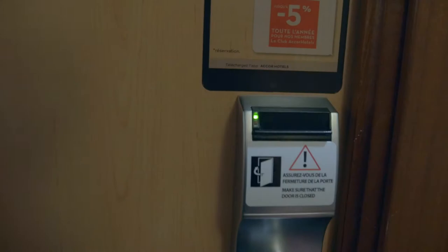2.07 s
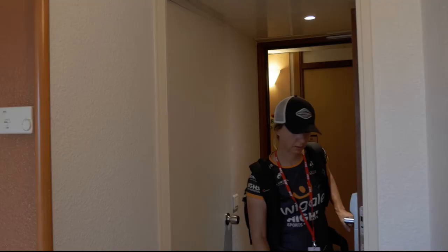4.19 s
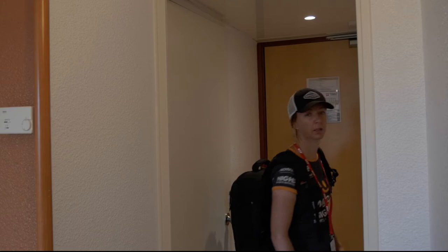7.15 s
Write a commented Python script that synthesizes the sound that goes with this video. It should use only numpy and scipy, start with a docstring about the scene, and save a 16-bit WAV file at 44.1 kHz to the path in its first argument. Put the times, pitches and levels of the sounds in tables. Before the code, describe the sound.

Small crisp clicks and a quick card scrape open in a quiet, reverberant corridor. The lock snaps a second later, its parts shivering briefly. Around three seconds the handle gives a burst of hard clunks, the loudest moment, followed by a tiny high squeak and rumbling air as the door swings. Then, heard from inside a softer room with louder ventilation, cloth brushes, small ticks sound, and the door clunks closed with a short echo.

```python
"""A card rattles in the slot of a lock on a wooden door, over a steady hum of ventilation. Lock and handle click,
then air puffs past the microphone as the door swings, with a thin hinge squeak. Later, from further inside
the room, come knocks and rustling clothes, and the door latches and shuts. Short bursts ring damped modes for
clicks, soft pushes ring the door, and shaped noise makes the rustle, air and hum."""
import sys
import numpy as np
from scipy import signal
from scipy.fft import rfft, irfft
from scipy.io import wavfile
from scipy.ndimage import uniform_filter1d

SR = 44100
rng = np.random.default_rng(int(sys.argv[2]) if len(sys.argv) > 2 else 0)


def convert_level_to_amplitude(level_db):
    """Map a level in decibels to its linear amplitude factor."""
    exponent = np.asarray(level_db, float) / 20
    return 10 ** exponent


def wav_record(signal):
    """Record a signal, one row per channel, as 16-bit PCM in the file named by sys.argv[1]."""
    frames = np.transpose(np.atleast_2d(signal))
    bounded = np.clip(frames, -1, 1)
    # unit amplitude maps onto the largest positive 16-bit level
    quanta = np.round(bounded * 32767).astype(np.int16)
    wavfile.write(sys.argv[1], SR, quanta)


N = 318402  # length in samples
MOVE_S = 4.078  # from here on the microphone is inside the room

# The tones that the lock plate and handle ring with, before each sound shifts and weights them.
# Each row: pitch in Hz, level in dB, time to fall by 60 dB in seconds.
LOCK_MODES = [(500, -6, .016), (700, -2, .024), (900, -2, .017), (1150, -.5, .014), (1500, -1, .011),
              (1950, -1, .015), (2330, -1.5, .011), (2800, -2.5, .009), (3480, 0, .010), (4200, -1, .006),
              (4800, -1, .006), (5500, 1.5, .006), (6300, 1.5, .005), (7300, -1, .004), (8600, -4, .003)]


def level(x):
    """Scale to an average (rms) level of 1."""
    return x / np.sqrt(np.mean(x ** 2))


def band(x, lo_hz, hi_hz, order=2):
    """Keep only the part between two pitches (Butterworth band-pass)."""
    return signal.sosfilt(signal.butter(order, [lo_hz, min(hi_hz, .45 * SR)], "band", fs=SR, output="sos"), x)


def walk(rate):
    """Slow random wavering: levels held for 1 / rate seconds and smoothed twice, with rms near 1."""
    hold = int(SR / rate)
    steps = np.repeat(rng.standard_normal(N // hold + 1), hold)
    return level(uniform_filter1d(uniform_filter1d(steps, hold), hold)[:N])


def coloured(spectrum):
    """Noise whose strength at each pitch follows (Hz, dB) points."""
    hz, db = np.transpose(spectrum)
    f = np.arange(N // 2 + 1) * SR / N + 1
    return irfft(rfft(rng.standard_normal(N)) * convert_level_to_amplitude(np.interp(np.log(f), np.log(hz), db)), N)


def ring(modes, weight_db, size):
    """How an object rings after one sharp tap: a sum of fading sine tones."""
    hz, db, t60 = np.transpose(modes)[:, :, None]
    t = np.arange(size) / SR
    flip = (-1.) ** np.arange(len(modes))[:, None]  # opposite signs for neighbours leave no deep notches
    tones = flip * np.sin(2 * np.pi * hz * t) * np.exp(-np.log(1000) * t / t60)
    return np.sum(convert_level_to_amplitude(db + weight_db[:, None]) * tones, axis=0)


def add(out, s, x):
    """Mix x in at time s."""
    i = int(s * SR)
    out[i:i + len(x)] += x[:len(out) - i]


def even(x):
    """Flatten the broad spectrum, so that the modes alone give the colour."""
    spectrum = rfft(x)
    flat = irfft(spectrum / np.sqrt(uniform_filter1d(np.abs(spectrum) ** 2, size=60)))
    return flat * (np.arange(len(x)) < len(x) - 500)  # silence at the very end


def all_round(click, size):
    """What a click radiates summed over all directions: one short pulse with the smoothed spectrum."""
    power = uniform_filter1d(np.abs(rfft(click)) ** 2, size=size)
    return np.roll(irfft(np.sqrt(power)), shift=80)[:160] * np.hanning(160)


def room(x, t60_share, build_s):
    """Echo tail: octave bands of noise, each fading at its own rate, as sound scattered by many walls does."""
    # How the space answers at each pitch; t60_share scales the times.
    # Each row: pitch in Hz, level in dB, time to fall by 60 dB in seconds.
    room_bands = [(100, -1.5, 0.72), (366, 3.5, 0.82), (1500, -0.5, 0.4), (4860, -2.5, 0.65),
                  (13030, -7.5, 0.063)]
    hz, db, t60 = np.transpose(room_bands)
    t = np.arange(SR) / SR
    tail = 0
    for f in 60 * 2 ** np.arange(9):
        band_t60 = t60_share * np.interp(np.log(f), np.log(hz), t60)
        decay = np.exp(-np.log(1000) * t / band_t60)
        noise = band(rng.standard_normal(SR), f / np.sqrt(2), f * np.sqrt(2))
        tail = tail + noise * decay * convert_level_to_amplitude(np.interp(np.log(f), np.log(hz), db))
    tail = tail * (1 - np.exp(-t / build_s))
    tail = tail * (1 + 0.88 * np.exp(-t / 0.015))  # near walls answer first and loudest
    return signal.fftconvolve(x, tail / np.sqrt(np.sum(tail ** 2)))[:N]


def ventilation():
    """Distant fans: wavering noise coloured by each space, with a faint steady 62 Hz hum in the corridor."""
    # The colour of the fan noise in each space. Each row: pitch in Hz, level in dB per Hz before scaling.
    corridor_colour = [(18, -40), (30, -10), (109, -19.5), (134, -20), (210, -9), (245, -11.5),
                       (374, -13.5), (426, -5.5), (473, -11.5), (649, -17), (702, -13), (1860, -29.5),
                       (2480, -29.5), (3580, -32), (16000, -62)]
    inside_colour = [(15, -36), (25, -12), (70, -19), (108, -6.5), (190, -16), (270, -1.5), (354, -9),
                     (427, -3.5), (677, -13), (1160, -18), (2050, -33.5), (2350, -30.5), (3620, -33.5),
                     (4370, -36.5), (16000, -65.5)]
    corridor_db, inside_db = -65, -56  # level between 200 and 1200 Hz
    opening_s, opening_db = 0.64, 14  # the corridor noise swells as the door swings open
    t = np.arange(N) / SR
    swell_db = opening_db * np.clip(1 + (t - MOVE_S) / opening_s, 0, 1) ** 2
    corridor_gain = convert_level_to_amplitude(corridor_db + swell_db) * (t < MOVE_S)
    inside_gain = convert_level_to_amplitude(inside_db) * (t >= MOVE_S)
    out = 0
    for gain, spectrum in ((corridor_gain, corridor_colour), (inside_gain, inside_colour)):
        noise = coloured(spectrum)
        noise = noise / np.std(band(noise, 200, 1200, order=4))
        out = out + gain * convert_level_to_amplitude(1.2 * walk(6.9)) * noise
    return out + convert_level_to_amplitude(-74.0) * np.sin(2 * np.pi * 62 * t) * (t < MOVE_S)


def gust():
    """Turbulent air on the microphone, lumpy and very low; the strongest lumps flatten."""
    # The puff of air; straight lines join the points. Each row: time in seconds, level in dB before wavering.
    puff_points = [(3.45, -65), (3.53, -57), (3.6, -59.5), (3.67, -55), (3.7, -60), (3.73, -45.5),
                   (3.85, -47.5), (3.88, -55.5), (4.075, -42)]
    s, db = np.transpose(puff_points)
    puff_db = np.interp(np.arange(N) / SR, s, db, -120, -120)  # silent outside the points
    air = level(band(band(rng.standard_normal(N), 22, 65, order=1), 13, 300))
    return convert_level_to_amplitude(puff_db + 1.5 * walk(25)) * band(np.tanh(air), 15, 300)


def squeak():
    """The hinge whistles in short spells on one thin, slightly wavering tone."""
    # The spells of whistling. Each row: start in seconds, length in seconds, level at the start in dB.
    spells = [(3.418, 0.014, -78), (3.453, 0.088, -74), (3.549, 0.037, -81.5)]
    pitch_hz, sag_db_per_s = 9090, 79
    t = np.arange(N) / SR
    gain = 0
    for s, length, db in spells:
        gain = gain + convert_level_to_amplitude(db - sag_db_per_s * np.abs(t - s)) * (t > s) * (t < s + length)
    phase = 2 * np.pi * np.cumsum(pitch_hz + 12 * walk(40)) / SR
    return np.sqrt(2) * uniform_filter1d(gain, size=400) * np.sin(phase)  # smoothed starts and ends


def rustle():
    """Card, hand and cloth slide: dense friction grains in half-octave bands swell and fade in strokes."""
    # The sliding strokes. Each row: time of the crest in seconds, crest level in dB before the bands are weighted,
    # centre pitch in Hz, rise in seconds, fall in seconds; rise and fall each span swell_db.
    strokes = [(.45, -64.5, 1000, .3, 0.6), (.62, -62, 8700, 0.15, 0.18), (.69, -45.5, 2270, 0.033, 0.098),
               (1.0, -69, 1212, 1, 0.97), (1.2, -58.5, 1990, 0.11, 0.1), (1.461, -60, 2500, 0.019, 0.48),
               (1.55, -68, 9600, 0.25, 0.069), (1.87, -68, 1020, 0.4223, 0.14),
               (2.9, -60.5, 1560, 0.23, 0.75), (3.55, -66.5, 1194, .3, 0.58),
               (4.07, -58.5, 989, 0.25, 0.071), (4.77, -66.5, 2393, 0.17, 0.15),
               (5.601, -54.5, 3990, 0.12, 0.11), (5.961, -61.5, 4052, 0.11, 0.047),
               (7.171, -67, 2240, 0.083, .5)]
    swell_db = 20
    db_per_octave, treble_db = 13.5, -25.5  # fall away from the centre, down to a flat floor
    out, t = np.zeros(N), np.arange(N) / SR
    grains = rng.standard_normal(N) * convert_level_to_amplitude(2.5 * walk(150))
    bands = [(hz, level(band(grains, hz / 1.25, hz * 1.25))) for hz in 600 * 2 ** np.arange(0, 4.6, .5)]
    for s, db, centre_hz, rise_s, fall_s in strokes:
        away = np.where(t < s, (s - t) / max(rise_s, .01), (t - s) / max(fall_s, .01))
        stroke = 0
        for hz, grain_band in bands:
            band_db = max(-db_per_octave * abs(np.log2(hz / centre_hz)), treble_db)
            stroke = stroke + convert_level_to_amplitude(band_db) * grain_band
        out += convert_level_to_amplitude(db - swell_db * away) * stroke
    return out


def thuds():
    """A soft half-sine push rings the door leaf; brief pushes hardly move its lowest modes."""
    # The pushes on the door. Each row: time in seconds, peak in dB, length of the push in ms.
    pushes = [(2.701, -50, 2.1), (2.744, -40, 0.69), (2.911, -49, 1.2), (3.015, -26.5, 2.1),
              (3.084, -22.5, 1.03), (4.049, -41, 1.4), (5.34, -48, 0.97), (5.393, -41.5, 0.79),
              (5.675, -45.5, 0.81), (6.469, -32.5, 0.48), (6.579, -24, 1.47), (6.591, -24.5, 2.14),
              (6.617, -24, 2.6), (6.653, -32, 3.5)]
    # The tones of the door leaf, before each push weights them.
    # Each row: pitch in Hz, level in dB, time to fall by 60 dB in seconds.
    leaf_modes = [(40, -5, .3), (90, -5, .16), (142, -1, .13), (200, -4, .08), (270, -1.5, .07),
                  (330, -2.5, .06), (420, -4, .04), (510, -7, .035)]
    out, octaves = np.zeros(N), np.log2(np.array(leaf_modes)[:, 0])
    for s, db, push_ms in pushes:
        push_ms = max(push_ms, .2)
        push = np.sin(np.pi * np.linspace(0, 1, int(push_ms * SR / 1000)))
        weight_db = -5.0 * (octaves[-1] - octaves) / push_ms
        weight_db = weight_db + 3.5 * rng.standard_normal(len(leaf_modes))  # no two thuds are alike
        body = signal.fftconvolve(push, ring(leaf_modes, weight_db, size=16384))
        add(out, s, convert_level_to_amplitude(db) * body / np.abs(body).max())
    return out


def spring():
    """Parts of the lock shiver on after a click: narrow, grainy bands of noise that fade."""
    # The shivers. Each row: start in seconds, pitch in Hz, width in Hz, level at the start in dB,
    # time to fall by 60 dB in seconds.
    shivers = [(.18, 690, 100, -62, 0.92), (1.63, 950, 196.8, -58, 1.6), (1.907, 2110, 180, -53.5, 0.55)]
    out = 0
    for s, hz, width_hz, db, t60 in shivers:
        t = np.arange(N) / SR - s
        shiver = level(band(rng.standard_normal(N), hz - width_hz / 2, hz + width_hz / 2))
        out = out + convert_level_to_amplitude(db) * shiver * np.exp(-np.log(1000) * np.abs(t) / t60) * (t > 0)
    return out


def chatter():
    """Loose parts chatter while card or bolt moves: tiny random taps of uneven size ring the lock modes."""
    # The spells of chatter. Each row: start in seconds, length in seconds, level in dB.
    loose_spells = [(0.598, 0.052, -54), (0.672, 0.073, -40.5), (1.554, 0.06, -65), (1.871, 0.014, -45),
                    (3.02, 0.15, -43.5)]
    taps_per_s, pitch_hz, scatter_db = 2900, 2500, 3
    t = np.arange(N) / SR
    sizes = rng.standard_normal(N) * convert_level_to_amplitude(scatter_db * rng.exponential(size=N))
    taps = (rng.random(N) < taps_per_s / SR) * sizes
    gain = sum(convert_level_to_amplitude(db) * (t > s) * (t < s + length) for s, length, db in loose_spells)
    weight_db = -12.0 * np.abs(np.log2(np.array(LOCK_MODES)[:, 0] / pitch_hz))
    body = ring(LOCK_MODES, weight_db, size=1024)
    return signal.fftconvolve(gain * level(taps), body / np.sqrt(np.sum(body ** 2)))[:N]


def rattle(fade):
    """Contact noise that starts quickly and dies away, with its broad spectrum flattened."""
    return even(rng.standard_normal(4096) * np.exp(-fade) * (1 - np.exp(-6 * fade)))


def clicks():
    """A short rattling contact rings the damped lock modes and the wood below, and cracks in the treble."""
    # Clicks of card, lock and handle close by. Each row: time in seconds, peak of the ringing in dB,
    # strongest pitch in Hz, wood in dB, treble crack in dB against the ringing, rattle fade in ms.
    close_clicks = [(0.099, -32, 2390, 0.5, -13, 2.2), (0.116, -42, 2300, 2, -25, 1),
                    (0.1192, -31.5, 1940, -8, -28, 2), (0.175, -27, 2320, -7, -17, 1.3),
                    (0.1792, -28.5, 1950, 11.5, -9, 2.5), (.374, -34, 2610, -6.5, -14, 11),
                    (.396, -37, 3000, 0, 3, 1.6), (.529, -33.5, 1960, -3, -18, 3.5),
                    (0.629, -36, 2410, 4, -19, 2.6), (.654, -14, 2374, -12, -10, 0.36),
                    (0.698, -24.5, 2970, -13, -6.5, 8.3), (0.7185, -26, 2000, -11.5, -3.5, 1.5),
                    (0.7415, -29, 3102, -0.5, -7.5, 0.98), (1.5495, -38, 1970, -0.5, -28.5, 2),
                    (1.559, -17, 2000, -3, -0.5, 2.5), (1.576, -22.5, 3850, -8.5, -4.5, 3),
                    (1.5965, -22.5, 2670, -8, -14, 2), (1.624, -16, 2270, -7, -5, 1.6),
                    (1.882, -31.5, 4140, -6, -20, 0.7), (1.9059, -25.5, 2180, -12.5, -9.5, 1.2),
                    (2.697, -40, 2500, -4.5, -3, 3.2), (2.723, -44, 2650, -5, -3.5, 2),
                    (2.742, -33.5, 1500, 3.5, -21.5, 9), (2.907, -45, 1500, -2.5, -14, 2.4),
                    (2.97, -40, 3204, 5, -8, 1.3), (3.0142, -2.5, 3510, -25, -14.5, 0.5),
                    (3.0146, -8, 1245, -11.5, -30, 0.63), (3.076, -16, 2030, -5, -22.5, 7.3),
                    (3.086, -9, 3290, -3.5, -7.5, 6.4), (3.0905, -8, 3730, -10, -21.5, 2),
                    (3.2105, -28, 1500, -4.5, -31.5, 2), (3.2143, -5, 1640, -5, -18, 0.8),
                    (3.2445, -21.5, 5270, -8.5, 0.5, 4), (3.249, -16, 1935, -3, -6.5, 3)]
    # Thin ticks as the door passes. Each row: time in seconds, peak of the ringing in dB, pitch in Hz.
    door_ticks = [(3.986, -50, 6030), (4.01, -49.5, 5250), (4.043, -41, 5310), (4.073, -43.5, 6250)]
    # Knocks across the room, ending with the latch and the door shutting. Each row: time in seconds,
    # peak of the ringing in dB, pitch in Hz, wood in dB, treble crack in dB against the ringing,
    # fall away from the pitch in dB per octave.
    room_knocks = [(4.083, -43, 2610, -4, -19.5, 4), (4.291, -49.5, 2850, 7, -9.5, 18),
                   (4.302, -57.5, 5500, -18, -10.5, 14), (4.391, -57, 6000, -14, -4, 5),
                   (4.402, -42, 3690, -1.5, -4, 5), (4.412, -44.5, 3680, -17, -5.5, 2.5),
                   (5.335, -49.5, 2500, 14, -38, 4), (5.573, -52.5, 4060, -19.5, -10, 6),
                   (4.754, -56.5, 2400, 7, -21, 15), (6.374, -56, 2450, 7.5, -12.5, 4),
                   (6.466, -18.5, 3500, 1.5, -11, 1.5), (6.58, -31.5, 1500, -13, -19, 1),
                   (6.596, -20.5, 1500, -22, -9, 0)]
    tick_wood_db, tick_treble_db, tick_ms = 2, -11, .6
    near_room_db, near_db_per_octave = -12.5, 11  # level sent to the echo; fall away from the pitch
    knock_ms, knock_room_db = 4.9, 6
    struck_mode_db = 5  # the mode at the pitch stands out

    near, far, t = np.zeros(N), np.zeros(N), np.arange(4096) / SR
    octaves = np.log2(np.array(LOCK_MODES)[:, 0])
    near_end = (near_room_db, near_db_per_octave)
    rows = [row + near_end for row in close_clicks]
    rows += [row + (tick_wood_db, tick_treble_db, tick_ms) + near_end for row in door_ticks]
    rows += [row[:-1] + (knock_ms, knock_room_db, row[-1]) for row in room_knocks]
    for s, db, hz, wood_db, treble_db, rattle_ms, room_db, slope_db in rows:
        fade = t * 1000 / max(rattle_ms, .1)
        metal_db = -slope_db * np.abs(octaves - np.log2(hz))
        struck = np.argmax(metal_db)  # the nearest mode; the lowest one where the slope is 0
        weight_db = np.maximum(metal_db, wood_db - 3.0 * np.abs(octaves - np.log2(780)))
        weight_db[struck] += struck_mode_db
        # grip and load shift all modes together, so that the struck one lands on the pitch
        held = np.array(LOCK_MODES) * [hz / LOCK_MODES[struck][0], 1, 1]
        body = signal.fftconvolve(rattle(fade), ring(held, weight_db, size=2048))[:4096]
        body = band(body, 250, 22000)
        crack = band(rattle(fade), 4200, 12000, order=1)
        click = body / np.abs(body).max() + convert_level_to_amplitude(treble_db) * crack / np.abs(crack).max()
        add(near, s, convert_level_to_amplitude(db) * click)
        add(far, s, convert_level_to_amplitude(db + room_db) * all_round(click, size=75))
    return near, far


def scene():
    """Direct sounds, the echo tails of corridor and room, and the background."""
    near, far = clicks()
    leaf, cloth, loose = thuds(), rustle(), chatter()
    inside = np.arange(N) / SR > MOVE_S
    leaf_send = convert_level_to_amplitude(np.where(inside, -10.5, -6)) * leaf
    send = far + leaf_send + convert_level_to_amplitude(-8.5) * cloth + convert_level_to_amplitude(-13.5) * loose
    corridor_tail = room(send * ~inside, t60_share=0.99, build_s=.0005)
    inside_tail = room(send * inside, t60_share=0.71, build_s=.0012)  # soft furnishings shorten the tail
    direct = near + leaf + cloth + loose
    return (direct + corridor_tail + inside_tail + spring() + gust() + squeak() + ventilation())[None]


def top_cut(x):
    """Nothing passes above the cut-off."""
    return signal.sosfilt(signal.butter(12, 16830, fs=SR, output="sos"), x)


def record(dry):
    """A small camera: thin in the lowest bass, with a steady hiss of its own."""
    hiss = convert_level_to_amplitude(-84.5) * level(band(rng.standard_normal(N), 3300, 16000, order=1))
    thin = signal.sosfilt(signal.butter(2, 32, "high", fs=SR, output="sos"), dry + hiss)
    return top_cut(thin)


dry = scene()
out = record(dry)
wav_record(out)
```